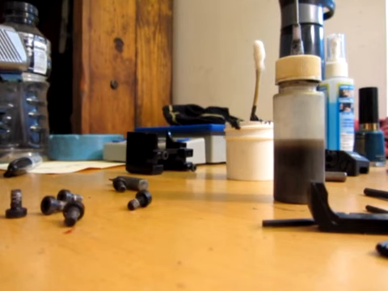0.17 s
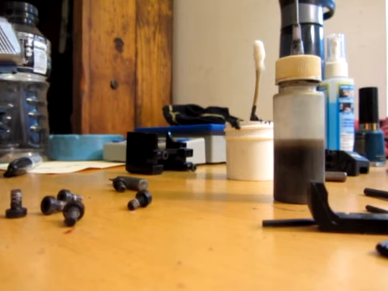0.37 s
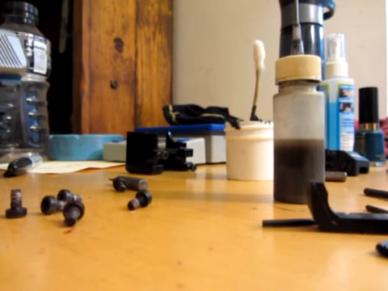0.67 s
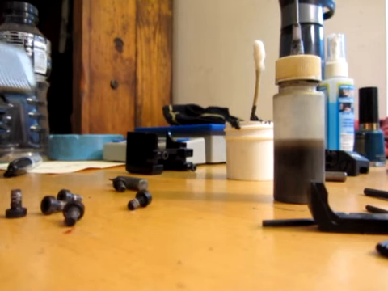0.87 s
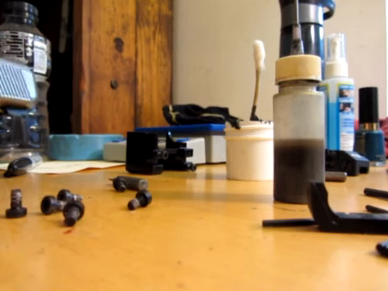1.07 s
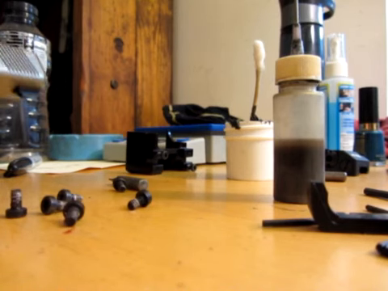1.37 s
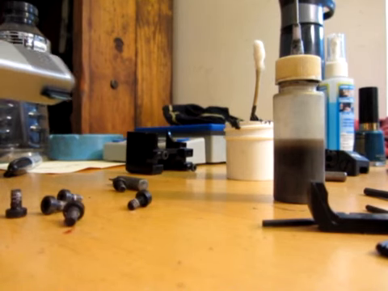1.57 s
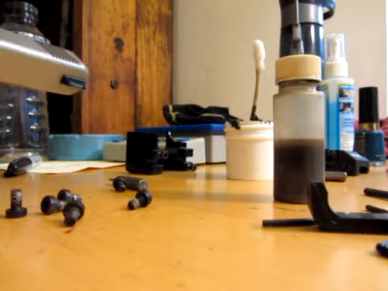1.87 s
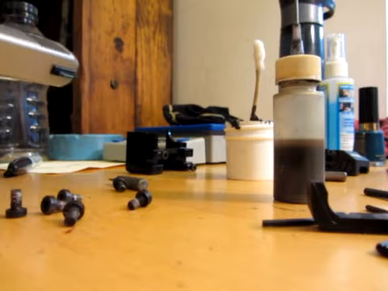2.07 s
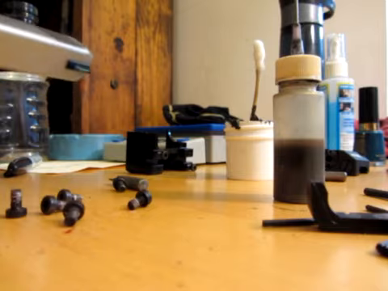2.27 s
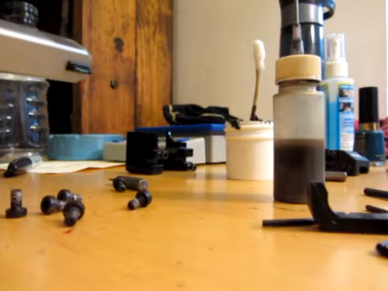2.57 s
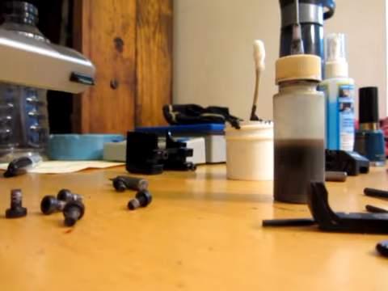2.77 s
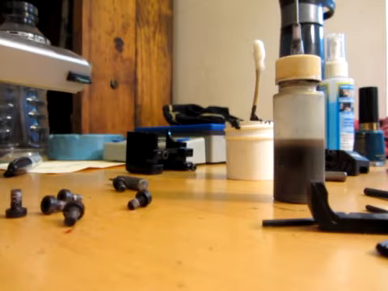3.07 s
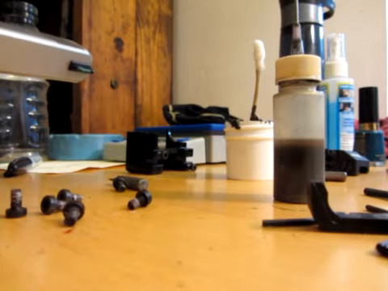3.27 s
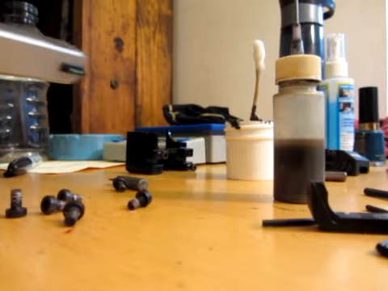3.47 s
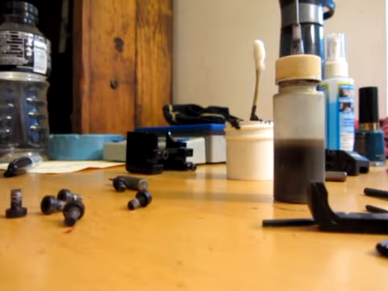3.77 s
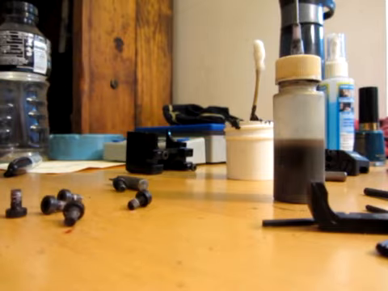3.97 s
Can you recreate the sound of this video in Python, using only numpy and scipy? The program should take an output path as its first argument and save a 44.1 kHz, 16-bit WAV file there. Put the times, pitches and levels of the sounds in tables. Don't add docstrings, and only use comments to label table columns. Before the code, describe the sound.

Steel pistol parts click, scrape and knock over a wooden bench in a small quiet room, ending in a fast, hard run of metallic clacks.

```python
import sys
import numpy as np
from scipy import signal
from scipy.fft import rfft, irfft, next_fast_len
from scipy.io import wavfile
from scipy.ndimage import uniform_filter1d

SR = 44100
rng = np.random.default_rng(int(sys.argv[2]) if len(sys.argv) > 2 else 0)


def int16_out(signal):
    q = np.round(np.clip(np.atleast_2d(signal).T, -1, 1) * 32767)
    wavfile.write(sys.argv[1], SR, q.astype(np.int16))


def decibels_to_gain(level_db):
    exponent = np.asarray(level_db, float) / 20
    return 10 ** exponent


N = 182441

# frequency in Hz, level in dB per Hz.
HUSH = [(12, -38), (20, 0.5), (293, -5), (1220, -17), (1330, -18.5), (1440, -19.5), (1910, -17.5),
        (2820, -16), (3250, -18), (4670, -24), (5230, -17.5), (5680, -21.5), (8000, -24), (10200, -34),
        (11400, -99), (16000, -60)]
# frequency in Hz, likeness from -1 to 1.
HUSH_ALIKE = [(60, -0.767), (180, -0.572), (550, -0.316), (1650, 0.25), (4970, -0.011), (15000, 0.071)]
# time in seconds, lift in dB.
STIR = [(0, 4.5), (.6, 1.5), (1.2, 4.5), (1.6, 8), (2.5, 10), (2.75, 12), (3.0, 12.5), (3.45, 13.5),
        (3.998, 6.5), (4.14, 1.5)]
HUSH_DB, HIGH_HUSH_DB, HIGH_SHARE = -63.5, -6, 0.7
# frequency in Hz, width in Hz, level in dB.
HUM = [(61.44, 6.4, -72), (115, 22, -72.5), (244, 20, -87), (386.8, 12, -88.5)]
# start in seconds, end in seconds, level in dB, second harmonic in dB.
MOTOR_RUNS = [
    (.19, .40, -77, -14),
    (1.13, 1.33, -77, -11),
    (2.04, 2.27, -74, -11),
    (2.95, 3.22, -73, -14),
    (4.05, 4.14, -81, -10),
]
MOTOR_HZ = 5160

# frequency in Hz, left-right difference in dB.
PORT_DB = [(100, 8), (250, 5.5), (700, 12.5), (1300, 9), (2400, 11.5), (4400, 8), (8000, 9), (15000, 7)]
# frequency in Hz, lag in radians.
PORT_TURN = [(20, 0), (600, .45), (1500, 1.1), (2500, 2), (3800, 4.2), (5400, 4.9), (7500, 5.3),
             (9500, 6.0), (12000, 7.3), (16000, 9)]
# time in seconds, extra left-right difference in dB.
HANDS = [(0, -15), (0.351, -6.5), (.45, -11), (1.001, -7.5), (1.5, -9), (2.4, -6.5), (3.001, -5),
         (3.3, -7.5), (4.14, -5.5)]
BENCH_LAG, BENCH_PAN_DB = 0.25, -0.5
# frequency in Hz, T60 in seconds.
ROOM_T60 = [(100, 0.075), (500, 0.2177), (2000, 0.2377), (6000, 0.1914), (12000, 0.14), (16000, 0.018)]
ROOM_TURN_S = .37
EARLY_DB, EARLY_S = 6.5, 0.0044

# frequency in Hz, width in Hz, level in dB.
BENCH = [(253.5, 63, 7.5), (320.2, 62, 3), (387.7, 19, 3.5), (523, 55, -1.5)]
BENCH_TOP = [(624.9, 106, 9.5), (765, 180, 7), (967, 208, 0), (1089, 790, -5), (1550, 570, -15),
             (2538, 220, -8)]
BENCH_LEGS = [(57.4, 11, -3), (98.6, 16, 1.5), (145.3, 6, -1.5)]
# peak in seconds, level in dB, fall in seconds, shake of the legs in dB, brightness in dB.
SHOVES = [(.292, -41.5, 0.0299, 0, -9.5), (1.335, -38, 0.0754, -9.5, 0), (1.388, -27.5, 0.029, -9.5, -3),
          (1.428, -23, 0.0416, -13.5, -12.5), (1.517, -39, 0.014, 1, -4.5), (1.555, -48, 0.156, 0.5, -12.5),
          (1.856, -31.5, 0.092, -36.5, -2), (2.008, -43, 0.0119, -5, 0.5), (2.09, -36.5, 0.0643, -21.5, -1),
          (2.124, -38.5, 0.0485, -27.5, -5.5), (2.278, -49, 0.078, -0.5, -1),
          (2.476, -42, 0.0173, -2.5, 3.5), (2.547, -59, 0.103, -8.5, -11), (3.103, -34, 0.087, -15.5, -2.5),
          (3.221, -31.5, 0.0772, -14, 1.5), (3.534, -52.5, 0.067, 15, -1.5), (3.579, -62, 0.298, 15.5, -11),
          (3.747, -37.5, 0.12, -2.5, 2), (3.816, -36.5, 0.04, -0.5, 2), (3.858, -32.5, 0.01, -34, 5)]
SHOVE_RISE_S = .011
# start in seconds, peak in dB, length in seconds, thud in dB.
BOUNCES = [
    (1.381, -30, 0.016, -1.5),
    (1.387, -36, 0.0068, 7.5),
    (1.418, -11.5, 0.00306, -12.5),
    (2.01, -46.5, 0.0037, -6.5),
    (2.548, -41.5, 0.0043, -3.5),
    (2.95, -37.5, 0.0073, -4),
    (3.102, -44, 0.0038, -6),
    (3.4792, -30.5, 0.00746, -16),
    (3.757, -31.5, 0.024, -10),
]
ROCK_START_S, ROCK_GAP_S, ROCK_SHRINK = 1.4523, .0572, .92
ROCK_DB, ROCK_LOSS_DB, ROCK_LENGTH_S, ROCK_THUD_DB = -25, 5.5, 0.0092, -27

# frequency in Hz, level in dB per Hz.
STEEL = [(150, -41), (300, -13), (1000, -2.5), (2600, 4.5), (3500, -2), (5600, 7.5), (7500, -3),
         (10500, -14), (13000, -13), (16000, -35), (18000, -31.5)]
# frequency in Hz, width in Hz, level in dB.
STEEL_MODES = [(1087, 68, -6.5), (1590, 40, -17), (2030, 86, -26), (2488, 230, -20), (2580, 120, -0.5),
               (3000, 610, 21), (4700, 83, -15), (5504, 250, -21.5), (6800, 84, -9.5), (10000, 400, 8)]
# time in seconds, pressure in dB, cavity resonance in Hz.
DRAG = [
    (.73, -69.5, 1000),
    (.735, -44, 965),
    (0.749, -40.5, 825),
    (0.763, -30.5, 735),
    (0.774, -38, 832),
    (0.782, -33, 944),
    (.79, -41, 828),
    (0.807, -41.5, 814),
    (.85, -48, 713),
    (0.931, -63, 904),
]
SEATED_S, ENTRY_HISS_DB, SEATED_HISS_DB = 0.7675, 4.5, -2.18
# peak in seconds, level in dB, fall in seconds.
SPRING = [
    (2.014, -49.5, 0.088),
    (2.311, -54, 0.029),
    (2.645, -38, 0.0115),
    (2.83, -50, 0.02),
]
# frequency in Hz, width in Hz, level in dB.
SPRING_MODES = [(1720, 70, 0), (2650, 140, -10)]
SPRING_RISE_S = 0.0075
# peak in seconds, pressure in dB, rise in seconds, fall in seconds, resonance in Hz.
HISSES = [
    (.006, -66, 0.00477, 0.063, 1672),
    (2.278, -65, 0.0143, 0.208, 1940),
    (2.465, -51, 0.0037, 0.0261, 2030),
    (3.497, -49.5, 0.0093, 0.018, 2420),
]
RUBS = [
    (3.431, -45.5, .03, 0.038, 2114),
    (3.718, -35.5, 0.098, 0.2396, 2016),
]
GRIPS = [
    (3.519, -34, 0.01, 0.0254, 2200),
    (3.572, -34, 0.02, 0.0974, 2862),
    (3.665, -27.5, .015, 0.017, 2140),
    (3.775, -36.5, 0.11, 0.057, 1908),
    (3.823, -18, 0.019, 0.021, 2553),
    (3.864, -22.5, .065, 0.055, 2058),
]
BRUSHES = [
    (.478, -45.5, .006, 0.1138, 2650),
    (0.522, -45.5, 0.068, 0.0353, 2617),
]
# top hiss in dB, sharpness from 0 to 1.
SLIDE_KINDS = [
    (10, 0.66),
    (-3.5, 0.3),
    (-8.5, 0.43),
    (2, 0.12),
]
TOP_RATIO = 2.351
AIR_DB = -25
# start in seconds, peak in dB, strongest
# ring in Hz, top crack in dB, rattle T60 in seconds.
THIN_CLICKS = [(.2941, -16.5, 6800, -24.5, 0.0048), (.2985, -35, 3380, -6, 0.015),
               (.3903, -33, 4290, -3, 0.02), (2.4631, -27, 4700, -30.5, 0.0234),
               (3.054, -30, 2045, -12, 0.0162), (3.8652, -11.5, 1834, -8, 0.011),
               (3.8955, -17, 5594, -3, 0.0079), (3.9048, -25.5, 5600, -8, 0.0086)]
FULL_CLICKS = [(.2905, -18, 3646, 1.5, 0.0249), (.2915, -17, 3755, 4, 0.00547),
               (1.1175, -49.5, 1950, -3, 0.053), (2.5491, -49, 2610, -7.5, 0.017),
               (2.6287, -15.5, 2792, -6.5, 0.0034), (2.6334, -17.5, 1658, -19, 0.0287),
               (2.6395, -15, 4915, -12.5, 0.0123), (2.8085, -38.5, 2480, -25.5, 0.048),
               (2.8182, -28.5, 2560, -8.5, 0.0077), (2.826, -30.5, 2850, -14, 0.066),
               (2.9881, -18.5, 1550, -6.5, 0.0372), (3.4783, -12.5, 5800, -6, 0.00927),
               (3.5167, -27.5, 1680, -30, 0.0082), (3.5285, -10, 2784, -12, 0.0041),
               (3.6625, -20.5, 2654, -17.5, 0.034), (3.7118, -29, 1970, -14.5, 0.0079),
               (3.7633, -16.5, 1720, -14, 0.0267), (3.805, -12, 2020, 4.5, 0.0083),
               (3.8187, -6.5, 2700, -4.5, 0.006), (3.8317, -8.5, 5670, -2.5, 0.0094)]
DULL_CLACKS = [(.7399, -28.5, 2742, -18.5, 0.012), (1.324, -39.5, 1575, -9, 0.105),
               (1.342, -41, 2030, -6, 0.101), (1.3857, -31, 1400, -8.5, 0.0027),
               (1.4185, -22.5, 1570, -16.5, 0.0019), (1.452, -36, 2000, -7.5, 0.0053),
               (1.852, -35.5, 1703, -5.5, 0.0064), (2.9506, -38.5, 2230, -9.5, 0.0074),
               (2.9924, -16, 1590, -38.5, 0.0026), (3.218, -28.5, 2047, -23, 0.0068),
               (3.7445, -25.5, 2303, -0.5, 0.061), (3.847, -22.5, 1006, 7, 0.012),
               (3.8574, -15, 2047, -10.5, 0.0087)]
MORE_FULL_CLICKS = [(.2885, -25.5, 3910, -5, 0.0154), (.2962, -28.5, 6620, 11.5, 0.0093),
                    (.2995, -39, 9950, -9, 0.01), (.305, -46.5, 3705, -8, 0.0057), (.3095, -33.5, 6310, 0, 0.00875),
                    (2.8145, -30.5, 2020, -29, 0.0063), (3.4805, -18.5, 1610, -9.5, 0.0059),
                    (3.488, -39, 5080, -1.5, 0.0073), (3.538, -30.5, 2670, 7, 0.008),
                    (3.669, -23, 6040, -11.5, .006), (3.677, -27.5, 2400, -4.5, 0.0059),
                    (3.7135, -31, 4700, 5, 0.0046), (3.752, -24.5, 2000, -10.5, .006),
                    (3.7715, -30, 2100, -19.5, 0.006), (3.7775, -26.5, 1183, -18.5, 0.0044),
                    (3.8032, -10, 3100, -7, 0.0054), (3.8207, -12, 6000, -7.5, 0.0034),
                    (3.8245, -10.5, 2830, -20.5, 0.0075), (3.8385, -14.5, 7000, -22.5, 0.0054),
                    (3.8432, -13.5, 1800, -4.5, 0.0091), (3.849, -20.5, 5960, -8.5, 0.0051),
                    (3.869, -19.5, 2455, 2, 0.0086), (3.8765, -27, 2330, -1.5, 0.0064),
                    (3.891, -25.5, 6660, 1.5, 0.021), (3.899, -36.5, 2427, -3, .008)]
THIN_LOW_DB, FULL_LOW_DB, DULL_LOW_DB = -16, -7, -1
LIGHT_HZ, LIGHT_DB = 3200, -3.5
BUZZ_REF_S = .02
# start in seconds, peak in dB.
TIPS = [(0.2896, -23.5), (0.2922, -12.5), (0.742, -39.5), (2.4626, -56.5), (2.989, -40), (3.4787, -35.5),
        (2.631, -43), (3.713, -36.5), (3.8055, -27)]
TIP_T60_S = 0.014
# start in seconds, peak in dB, frequency in Hz, T60 in seconds.
PINGS = [(.2915, -22.5, 9484, 0.0227), (.2925, -21, 6154, 0.03), (.2930, -25, 1480, 0.0216),
         (.2945, -22.5, 2857, .045), (.2960, -24, 3832, .045), (.2985, -28.5, 10820, 0.0166),
         (1.3860, -33, 1802, 0.0335), (1.3960, -37, 1581, 0.082), (1.4185, -32.5, 2333, 0.0126),
         (1.4530, -45, 2760, 0.026), (2.6300, -30.5, 1680, 0.052), (2.6400, -29, 4700, 0.0317),
         (2.819, -26, 2726, 0.014), (2.8246, -19.5, 2650, .02), (2.8255, -32, 1700, 0.0714),
         (2.8255, -37, 625.5, 0.0503), (2.9890, -23.5, 1009, 0.0428), (3.4790, -22, 469, 0.017),
         (3.4795, -24.5, 1845, 0.017), (3.4870, -27.5, 5216, 0.041), (3.5286, -14, 2608, .013),
         (3.5305, -23.5, 3290, 0.022), (3.5640, -32, 3135, 0.092), (3.6690, -27.5, 6090, 0.0153),
         (3.7020, -33.5, 2050, 0.023), (3.7130, -34.5, 6940, 0.01), (3.7500, -28, 4960, .015),
         (3.8202, -17.5, 2792, .02), (3.8210, -22.5, 6136, .02), (3.827, -25.5, 2949, .025),
         (3.8320, -12, 5553, 0.023), (3.8400, -20.5, 6570, .02), (3.8455, -25, 5762, .03),
         (3.6640, -21, 2701, .03), (2.6360, -21.5, 2724, .03), (2.9900, -25.5, 3102, .04),
         (3.8650, -23.5, 6815, 0.0155), (3.8965, -29.5, 5553, 0.011)]
PING_RISE_S = 0.00072
# start in seconds, peak in dB, centre in Hz.
SNAPS = [(0.2909, -12.5, 5000), (.2923, -10.5, 4020), (.2950, -17, 4000), (1.3862, -32.5, 1489),
         (1.4188, -17.5, 1178), (1.4525, -27.5, 1475), (2.6287, -24.5, 2465), (2.6348, -26, 2000),
         (2.6400, -32, 2500), (2.826, -30, 2600), (2.9883, -21.5, 1990), (2.9932, -21, 1470),
         (3.4789, -15, 3410), (3.4805, -17.5, 1460), (3.5299, -14, 3936), (3.7645, -24.5, 1500),
         (3.7708, -26, 2000), (3.8058, -6, 3000), (3.8192, -17.5, 2500), (3.8322, -17, 5000),
         (3.8427, -16.5, 2000), (3.8585, -15.5, 1500), (3.8668, -14, 2200), (3.8962, -13.5, 5500)]
SNAP_SPAN = 1.65


def evened(x):
    return x / np.sqrt(np.mean(x ** 2) + 1e-20)


def read(points, hz):
    f, value = np.transpose(points)
    return np.interp(np.log(hz + 1), np.log(f + 1), value)


def add(mix, s, sound):
    part = mix[round(s * SR):][:len(sound)]
    part += sound[:len(part)]


def resonate(x, hz, width):
    turn = np.exp(2j * np.pi * np.cumsum(hz * np.ones(len(x))) / SR)
    r = np.exp(-np.pi * width / SR)
    return 2 * (turn * signal.lfilter([1 - r], [1, -r], x / turn + 1e-18)).real


def band(x, lo_hz, hi_hz):
    return signal.sosfilt(signal.butter(3, [lo_hz, min(hi_hz, 20000)], "band", fs=SR, output="sos"), x)


def ring(x, modes):
    return evened(sum(decibels_to_gain(db) * resonate(resonate(x, f, w), f, 3 * w) / np.sqrt(w) for f, w, db in modes))


def causal(points):
    level_db = read(points, abs(np.fft.fftfreq(2048, 1 / SR)))
    log_gain = np.log(decibels_to_gain(np.maximum(level_db, -100)))
    return np.fft.ifft(np.exp(log_gain - 1j * signal.hilbert(log_gain).imag)).real[:1024]


def grit(count, spread_db):
    draw = rng.random((count, 2))
    return np.sign(draw[:, 0] - .5) * decibels_to_gain(-spread_db * np.log(draw[:, 1] + 0.003))


def stroke(s, db, rise, fall, *steady):
    rise, fall = max(rise, .002), max(fall, .004)
    return [(max(s - rise, 0), db - 20, *steady), (s, db, *steady), (s + 1.5 * fall, db - 30, *steady)]


def unfold(rows):
    s, *columns = np.transpose(rows)
    t = np.arange(s[0], s[-1], 1 / SR)
    return s[0], signal.windows.tukey(len(t), .05), [np.interp(t, s, c) for c in columns]


def hush():
    frames, hz = N // 256 + 5, np.fft.rfftfreq(1024, 1 / SR)
    a, b, c, d, patches = rng.standard_normal((frames, 513, 5)).T
    patches = evened(uniform_filter1d(uniform_filter1d(patches, size=12, axis=0), size=12, axis=1))
    same = np.clip(read(HUSH_ALIKE, hz), -1, 1)[:, None]
    left = a + 1j * b
    right = same * left + np.sqrt(1 - same ** 2) * (c + 1j * d)
    z = np.array([left, right]) * decibels_to_gain(read(HUSH, hz)[:, None] + 2.6 * patches)
    stir_db = np.interp(np.arange(frames) * 256 / SR, *np.transpose(STIR))
    high = np.clip(np.log2(hz / 1500 + 1e-9), 0, 1)[:, None]
    z *= decibels_to_gain((1 - high) * stir_db + high * (HIGH_HUSH_DB + HIGH_SHARE * stir_db))
    return decibels_to_gain(HUSH_DB - 4) * signal.istft(z, nperseg=1024, noverlap=768)[1][:, :N]


def hum():
    air = rng.standard_normal((3, N))
    tones = [sum(decibels_to_gain(db) * evened(resonate(x, f, w)) for f, w, db in HUM) for x in air]
    return np.array([tones[0] + 0.73 * tones[1], tones[0] + 0.544 * tones[2]])


def motor():
    t = np.arange(N) / SR
    turn = 2 * np.pi * MOTOR_HZ * t
    out = np.zeros(N)
    for start, end, db, second_db in MOTOR_RUNS:
        gate = np.clip(np.minimum(t - start, end - t) / 0.0034, 0, 1)
        out += decibels_to_gain(db) * gate * (np.sin(turn) + decibels_to_gain(second_db) * np.sin(2 * turn))
    return np.sqrt(2) * out


def tail():
    taps = np.zeros((2, SR // 3))
    at = np.arange(150, SR // 3 - 10, 10)
    at = at + rng.integers(0, 10, (2, len(at)))
    np.put_along_axis(taps, at, rng.choice([-1., 1.], at.shape), 1)
    hz, t, z = signal.stft(taps, SR, nperseg=256)
    out = signal.istft(z * decibels_to_gain(-60 * t / read(ROOM_T60, hz)[:, None]), SR, nperseg=256)[1]
    out = out * decibels_to_gain(EARLY_DB * np.exp(-np.arange(out.shape[1]) / SR / EARLY_S / 2))
    return out / np.linalg.norm(out[0])


def room(x, count=3):
    turn = np.pi * np.arange(N) / SR / ROOM_TURN_S
    out = 0
    for k in range(count):
        share = np.sqrt(2 / count) * np.cos(turn + k * np.pi / count)
        out = out + signal.fftconvolve(x * share, tail(), axes=1)[:, :N]
    return out


def ports(x, lag=1, pan_db=0):
    size = next_fast_len(N + 4096)
    hz, spectrum = np.fft.rfftfreq(size, 1 / SR), rfft(x, size)
    shade, turn = decibels_to_gain(read(PORT_DB, hz) / 2), np.exp(-1j * lag * read(PORT_TURN, hz))
    side = decibels_to_gain((np.interp(np.arange(N) / SR, *np.transpose(HANDS)) + pan_db) / 2)
    left = irfft(spectrum * shade, size)[:N] * side
    right = irfft(spectrum * turn / shade, size)[:N] / side
    return np.array([left, right])


def shove(rows):
    s, edge, (level_db, legs_db, bright_db) = unfold(rows)
    push = grit(len(level_db), spread_db=-0.5)
    body = ring(push, BENCH)
    body = body + decibels_to_gain(legs_db + 1.5) * ring(push, BENCH_LEGS)
    body = body + decibels_to_gain(bright_db + 0.5) * ring(push, BENCH_TOP)
    return s, edge * decibels_to_gain(level_db - 4.5) * body


def bounce(peak_db, length, thud_db):
    t = np.arange(3000) / SR
    hz = 340 + 700 * np.exp(-t / 0.002847)
    rise = t / (t + 0.00074)
    wave = rise * np.exp(-t / np.clip(length, .002, .02)) * np.sin(2 * np.pi * np.cumsum(hz) / SR)
    thud = rise * np.exp(-t / 0.0093) * (np.sin(2 * np.pi * 240 * t) + 0.75 * np.sin(2 * np.pi * 142 * t))
    knock = wave / abs(wave).max() + decibels_to_gain(thud_db + 5.0) * thud / abs(thud).max()
    return decibels_to_gain(peak_db - 3.5) * band(knock, 78, 5000)


def rocking(count):
    k = np.arange(count)
    times = ROCK_START_S + ROCK_GAP_S * (1 - ROCK_SHRINK ** k) / (1 - ROCK_SHRINK)
    return [(s, ROCK_DB - ROCK_LOSS_DB * i, ROCK_LENGTH_S, ROCK_THUD_DB) for s, i in zip(times, k)]


def bench():
    out = np.zeros(N)
    for s, *blow in BOUNCES + rocking(count=4):
        add(out, s, bounce(*blow))
    for s, db, *rest in SHOVES:
        add(out, *shove(stroke(s, db, SHOVE_RISE_S, *rest)))
    return out


def drag():
    rows = [(*row, ENTRY_HISS_DB if row[0] < SEATED_S else SEATED_HISS_DB) for row in DRAG]
    s, edge, (pressure_db, hz, hiss_db) = unfold(rows)
    rub = grit(len(edge), spread_db=3.5)
    cavity = evened(resonate(resonate(rub, hz, 231), hz, 260))
    cavity = evened(cavity + 0.654 * evened(band(rub, 454, 1264)))
    hiss = evened(band(band(rub, 1850, 7590), 1180, 19000))
    return s, edge * decibels_to_gain(pressure_db - 5.0) * (cavity + decibels_to_gain(hiss_db) * hiss)


def spring(rows):
    s, edge, (level_db,) = unfold(rows)
    return s, edge * decibels_to_gain(level_db - 3.5) * ring(grit(len(level_db), spread_db=3.0), SPRING_MODES)


def slide(rows):
    s, edge, (pressure_db, hz, top_db, top_hz, sharp) = unfold(rows)
    rub, fine = grit(len(hz), spread_db=2.5), grit(len(hz), spread_db=3.5)
    sharp = np.clip(sharp, 0, 1)
    broad = evened(band(rub, 779, 4315))
    narrow = evened(resonate(resonate(rub, hz, 590), hz, 522))
    middle = (1 - sharp) * broad + sharp * narrow
    top_broad = evened(band(band(fine, 1430, 7560), 1520, 14000))
    top_narrow = evened(resonate(resonate(fine, top_hz, 810), top_hz, 530))
    top = (1 - sharp) * top_broad + sharp * top_narrow
    air = evened(band(fine, 7820, 15000))
    return s, edge * decibels_to_gain(pressure_db - 2.0) * (middle + decibels_to_gain(top_db) * top + decibels_to_gain(AIR_DB) * air)


def tip(peak_db):
    t = np.arange(900) / SR
    spit = band(grit(len(t), spread_db=2.0) * decibels_to_gain(-60 * t / TIP_T60_S), 8500, 16500)
    spit = evened(spit) + 0.65 * evened(resonate(spit, 10200, 1200))
    return decibels_to_gain(peak_db) * spit / abs(spit).max()


def ping(peak_db, hz, t60):
    t = np.arange(6000) / SR
    decay = decibels_to_gain(peak_db - 60 * t / max(t60, .005))
    return decay * np.minimum(t / PING_RISE_S, 1) * np.sin(2 * np.pi * hz * t)


def snap(peak_db, hz):
    pulse = band(np.eye(1, 600)[0], hz / SNAP_SPAN, hz * SNAP_SPAN)
    return decibels_to_gain(peak_db) * pulse / abs(pulse).max()


def steel_body(share):
    tap = np.eye(1, 1024)[0]
    return evened(causal(STEEL)) + share * ring(tap, STEEL_MODES)


def click(body, peak_db, hz, low_db, top_db, t60):
    t = np.arange(3000) / SR
    contact = grit(len(t), spread_db=3.5) * np.minimum(t / 0.00039, 1)
    blow = contact * decibels_to_gain(-60 * t / np.clip(t60, .003, .08))
    buzz = np.clip(contact, -2, 2) * decibels_to_gain(-28.5 - 60 * t / 0.071) * np.sqrt(min(t60 / BUZZ_REF_S, 1))
    rung = signal.oaconvolve(blow + buzz, body)[:len(t)]
    reach_hz = np.clip(14487.5 + 500 * top_db, 6000, 12500)
    favoured = resonate(resonate(blow, hz, 600), hz, 600)
    light_db = LIGHT_DB if hz > LIGHT_HZ else 0
    favoured_db = -6.0
    if hz > 4200:
        favoured_db += top_db - 0.5
    elif hz > LIGHT_HZ:
        favoured_db -= LIGHT_DB
    parts = [band(rung, 316, 1452), band(rung, 1149, 3548), band(rung, 2900, reach_hz), favoured]
    levels = (min(low_db, 0) + light_db, light_db, min(top_db, 10), favoured_db)
    return sum(decibels_to_gain(peak_db + db + 1.0) * p / abs(p).max() for p, db in zip(parts, levels))


def steel():
    out, body = np.zeros(N), steel_body(share=0.02)
    kinds = ((THIN_CLICKS, THIN_LOW_DB), (FULL_CLICKS, FULL_LOW_DB),
             (DULL_CLACKS, DULL_LOW_DB), (MORE_FULL_CLICKS, FULL_LOW_DB))
    for rows, low_db in kinds:
        for s, db, hz, top_db, t60 in rows:
            add(out, s, click(body, db, hz, low_db, top_db, t60))
    for rows, (top_db, sharp) in zip((HISSES, RUBS, GRIPS, BRUSHES), SLIDE_KINDS):
        for *push, hz in rows:
            add(out, *slide(stroke(*push, hz, top_db, TOP_RATIO * hz, sharp)))
    for s, db, fall in SPRING:
        add(out, *spring(stroke(s, db, SPRING_RISE_S, fall)))
    for s, db in TIPS:
        add(out, s, tip(db))
    for s, *mode in PINGS:
        add(out, s, ping(*mode))
    for s, *contact in SNAPS:
        add(out, s, snap(*contact))
    add(out, *drag())
    return out


def scene():
    metal, wood = ports(steel()), ports(bench(), BENCH_LAG, BENCH_PAN_DB)
    echoes = room(decibels_to_gain(-8.5) * metal + decibels_to_gain(-6) * wood)
    return metal + wood + echoes + hush() + hum() + motor()


def roll_off(x):
    return signal.sosfilt(signal.butter(12, 16630, fs=SR, output="sos"), x)


def record(dry):
    hz, _, z = signal.stft(dry, SR, nperseg=512)
    power = (abs(z) ** 2).mean(0)
    patch = uniform_filter1d(power, size=9, axis=0)
    floor = decibels_to_gain(2 * -46) * power.sum(0) + decibels_to_gain(2 * -103)
    weak = (patch < floor) & (hz > 10900)[:, None]
    kept = signal.istft(z * ~weak, SR, nperseg=512)[1][:, :N]
    return roll_off(kept)


dry = scene()
out = record(dry)
int16_out(out)
```